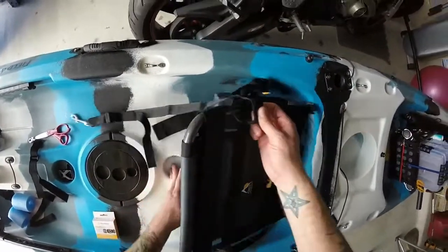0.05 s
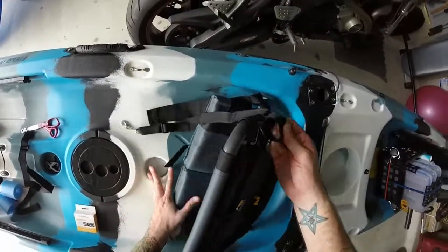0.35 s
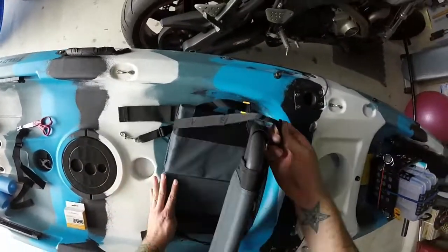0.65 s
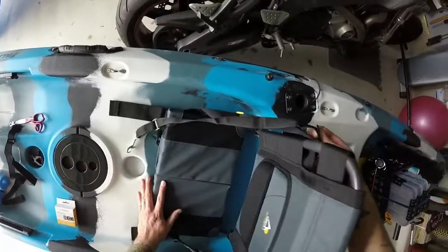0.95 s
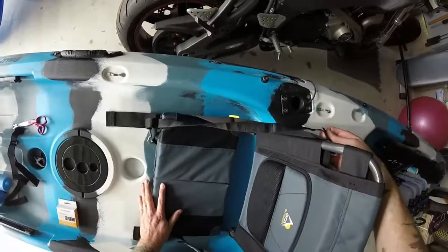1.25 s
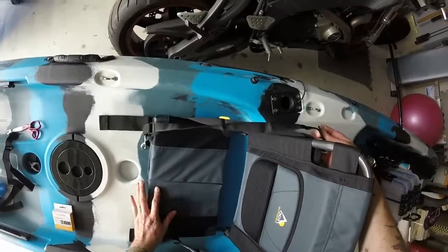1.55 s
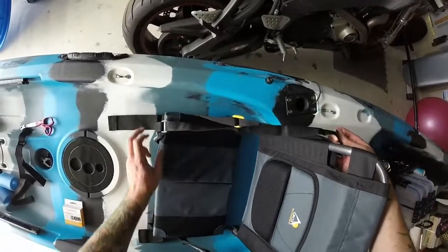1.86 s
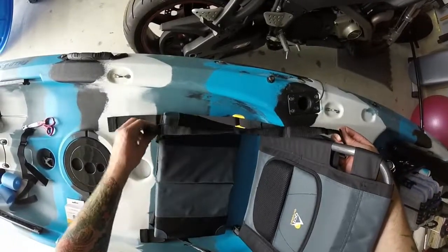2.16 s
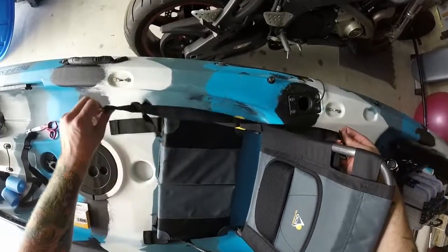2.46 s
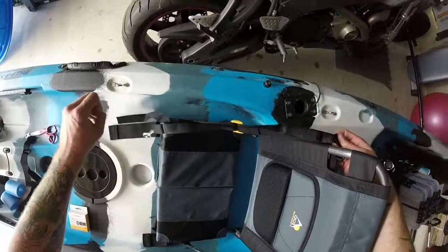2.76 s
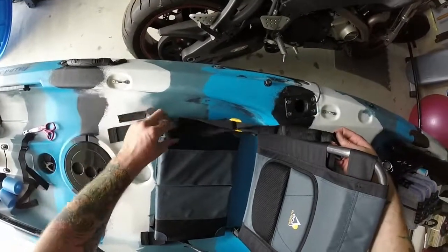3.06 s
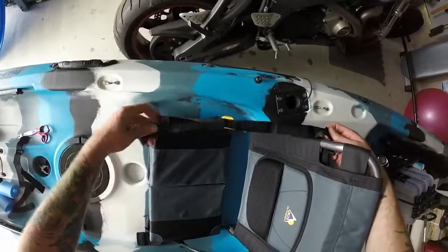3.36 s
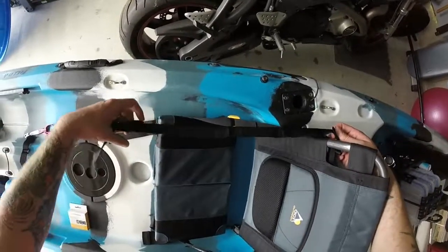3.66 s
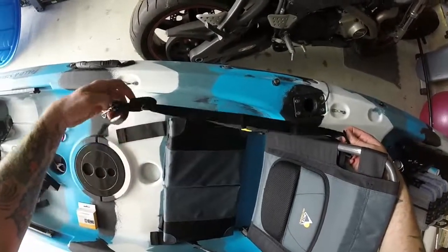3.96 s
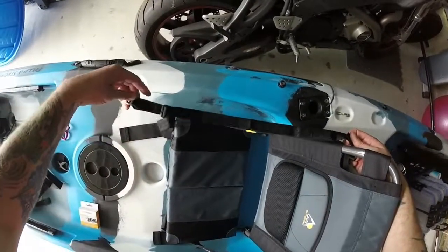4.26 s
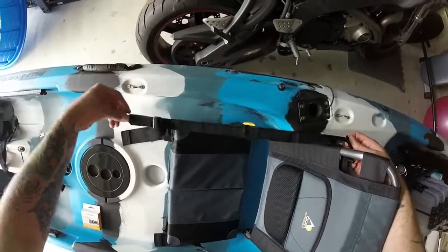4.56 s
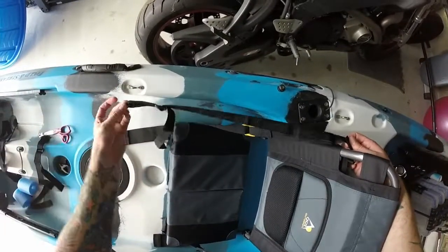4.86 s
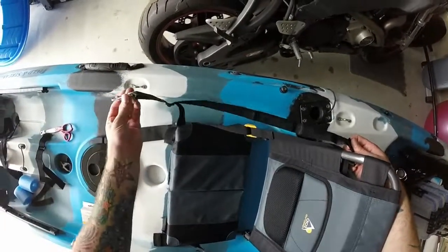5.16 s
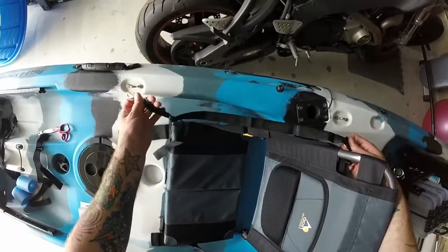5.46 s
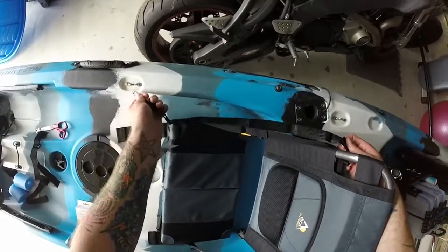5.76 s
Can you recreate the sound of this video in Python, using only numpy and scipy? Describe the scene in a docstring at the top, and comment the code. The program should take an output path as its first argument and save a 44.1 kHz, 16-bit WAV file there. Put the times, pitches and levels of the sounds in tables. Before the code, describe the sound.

Close handling sounds in a quiet, faintly humming garage. First comes a cluster of hollow thuds and rough dragging as a seat frame shifts on a plastic kayak, mixed with rasping webbing and rustling fabric. After softer bumps and a brief lull, a steel strap hook bangs loudly on the hull and clatters briefly. The hook then ticks lightly in the hand, with a few tiny squeaks and one soft knock at the end.

```python
"""Kayak seat and snap hook in a garage.

A folding seat is pushed open in a hollow plastic kayak. Its frame knocks on the hull, exciting damped
modes, and drags over it by stick-slip friction; a nylon strap rasps, the cloth swishes and thin squeaks
glide. Then the strap's metal snap hook is picked up, bangs on the hull and ticks in the hand.
The garage adds a short reverberation, and a faint hum fills the room."""
import sys
import numpy as np
from scipy import signal
from scipy.fft import rfft, irfft, next_fast_len
from scipy.io import wavfile

SR = 44100
rng = np.random.default_rng(int(sys.argv[2]) if len(sys.argv) > 2 else 0)


def master_out(mix):
    """Clip the mix to full scale and print it as 16-bit PCM to the path in sys.argv[1]."""
    frames = np.transpose(np.atleast_2d(mix))
    ceiling = np.clip(frames, -1, 1)
    pcm = np.round(ceiling * 32767).astype(np.int16)
    wavfile.write(sys.argv[1], SR, pcm)


N = 256506
TIME = np.arange(N) / SR
BLOW_TIME = TIME[:SR // 2]

# Spectrum of light contacts, cloth or steel. Each row: frequency in Hz, relative level in dB.
LIGHT_CONTACT_SPECTRUM = [(1500, -10), (3500, 8), (5500, 1), (7500, -3), (10000, -7.5), (11500, -14),
                          (11900, -10.5), (12400, -13), (14500, -18), (16000, -26)]


def hull_knocks():
    """Impact excitation: a blow gives a thud, panel modes, a hollow boom and, if hard, a crack."""
    # Each row: start in seconds, then relative levels in dB of the blow, its boom and its crack,
    # panel pitch in Hz, relative level of the panel's ring in dB.
    blows = [(0.096, -15, -17, -20, 785, -14), (0.110, -16, -1, -16, 214, -5),
             (0.151, -8, -19, -20, 567, -20), (0.204, -14, -12, -25, 209, -14),
             (0.465, -13, -13, -22, 525, -15.5), (0.514, -29.5, 7, -32, 486, -12),
             (0.630, -18, -4, -3.5, 450, -12.5), (0.64, -15, -18, -34, 463, -7),
             (0.653, -16.5, -5, -23, 455, -9), (0.897, -31, -25, -14, 713, -12),
             (1.017, -22.5, -37, -15, 885, -7), (1.068, -16.5, -9.5, -33, 835, -14.5),
             (1.221, -26.5, -28, -23, 473, -8.5), (1.745, -34.5, -11, -38, 123, -4),
             (1.860, -31, -1.5, -34, 137, -11), (2.023, -22.5, -19, -22, 500, -12),
             (2.619, -33, -13, -11, 332, -15), (2.773, -27, -8, -17.5, 750, -20),
             (2.809, -0.5, -11, -47, 960, -18), (2.850, -11, -14, -11, 305, -21.5),
             (3.022, -11.5, -20, -12.5, 545, -7.5), (3.122, -18.5, -21, -23, 640, -21.5),
             (5.797, -24, -18, -33, 960, -32)]
    # Spectra of the thud and the crack. Each row: frequency in Hz, relative level in dB.
    thud_spectrum = [(40, -29.5), (110, -14), (290, 1.5), (450, 2), (700, -3), (1000, -6), (1400, -13.5),
                     (1900, -18.5), (3500, -37.5), (16000, -84)]
    crack_spectrum = [(300, 15), (1000, 10), (1700, 5.5), (2400, 0), (3200, 0), (4200, -10), (6000, -19.5),
                      (8000, -29), (15000, -50)]
    out = np.zeros(N)
    for start, db, boom_db, crack_db, panel_hz, panel_db in blows:
        cutoff_hz = 7900 * 2 ** (crack_db / 18)  # softer contacts crack less and thud lower
        lowpass = signal.butter(2, cutoff_hz, fs=SR, output="sos")
        waves = signal.sosfilt(lowpass, impact(t60=0.12, cloud_db=7))
        tilt_db = 2 * np.log2(panel_hz / 660)  # stiffer panels thud brighter
        thud = from_db(-12) * unit_blow(colour(waves, thud_spectrum, tilt_db))
        panel = from_db(panel_db) * ring(hull_modes(panel_hz, fall_db=25.5), detune=0.0041)
        boom = from_db(boom_db - 6) * ring(hull_modes(centre_hz=209, fall_db=12), detune=0.0024)
        crack = from_db(crack_db) * unit_blow(colour(impact(t60=0.023, cloud_db=1.5), crack_spectrum))
        add(out, start, from_db(db) * (thud + panel + boom + crack))
    return out


def hull_modes(centre_hz, fall_db):
    """Selective excitation: a contact drives the modes near one pitch, fall_db less per octave away."""
    # Modes of the hull and its panels. Each row: frequency in Hz, relative level in dB, T60 in seconds.
    modes = [(122.5, -6, 0.62), (157.4, 5.5, 0.21), (197, -5.5, 0.11), (224.8, -3.5, 0.28),
             (308.6, -1.5, 0.2), (360.5, 0, 0.12), (403, -2, 0.24), (461, 7, 0.049), (505, 4, 0.057),
             (536, -6.5, 0.36), (572.5, 4.5, 0.053), (643, -11, 0.27), (751, 4, 0.1), (728, 1.5, 0.085),
             (885, 9, 0.094), (987, 1.5, 0.087), (1090, -39, 0.36), (1182, -13, 0.4), (1315, -44, 0.1)]
    return [(hz, db - fall_db * abs(np.log2(hz / centre_hz)), t60) for hz, db, t60 in modes]


def frame_drag():
    """Stick-slip friction: the frame catches on the hull, which rings, rumbles and flexes under it."""
    # Each row: start and length in seconds, then relative levels in dB of drag, rumble and flexing.
    shoves = [(-0.03, 0.59, -35, -34, -43), (0.64, 0.21, -44, -39.5, -45), (0.895, 0.12, -37, -56, -50),
              (1.04, 0.19, -38.5, -47, -40), (1.25, 0.14, -51, -53, -48), (1.57, 0.057, -45, -47, -50),
              (1.72, 0.26, -47, -42, -39.5), (3.04, 0.068, -47, -41.5, -43.5)]
    # Spectra of the drag, rumble and flexing. Each row: frequency in Hz, relative level in dB.
    drag_spectrum = [(40, -37), (150, 1), (280, -2.5), (390, 2.5), (520, 2), (850, -2), (1200, -6),
                     (1700, -16.5), (3000, -27.5), (16000, -54)]
    rumble_spectrum = [(25, -37), (70, -7), (120, -2.5), (180, 2.5), (240, -1), (330, 5), (700, -45.5),
                       (16000, -102)]
    flex_spectrum = [(20, -17), (45, -2), (75, 6.5), (110, -21), (200, -10), (600, -93), (16000, -100)]
    drag, rumble, flex = strokes(shoves, attack_s=0.037, release_s=0.25, sag_db_per_s=6)
    catches = slips(per_s=1400, size_db=2.5, clump_db=1.5)
    scrape = from_db(1) * rms_one(colour(catches, drag_spectrum))
    panel_response = ring(hull_modes(centre_hz=660, fall_db=2.5))
    panels = from_db(-1.5) * rms_one(signal.fftconvolve(catches, panel_response)[:N])
    jolts = slips(per_s=780, size_db=-3, clump_db=5.5)
    hollow = from_db(-6) * rms_one(colour(jolts, rumble_spectrum))
    groan = from_db(-3.5) * rms_one(colour(rng.standard_normal(N), flex_spectrum))
    return drag * (scrape + panels) + rumble * hollow + flex * groan


def frame_judder():
    """Self-excited oscillation: nearly periodic stick-slip makes the hull groan at the slip rate."""
    # Each row: start and length in seconds, slip rate in Hz, relative level in dB, total swell in dB.
    judders = [(0.203, 0.15, 210, -34.5, -18.5), (0.470, 0.089, 516, -36.5, -14), (3.04, .085, 500, -41, 3)]
    out = np.zeros(N)
    for start, length, slip_hz, db, swell_db in judders:
        along = np.linspace(0, 1, round(length * SR))
        hz = slip_hz * (1 + 0.09 * drift(rate=150)[:len(along)])
        phase = 2 * np.pi * np.cumsum(hz) / SR
        wave = np.sin(phase) + from_db(-30) * np.sin(2 * phase) + from_db(-24) * np.sin(3 * phase)
        grip = from_db(1.5 * drift(rate=120)[:len(along)])
        arch = np.abs(np.sin(np.pi * along)) ** 0.3
        add(out, start, from_db(db + 6 + swell_db * (along - 0.5)) * grip * arch * wave)
    return out


def strap_and_cloth():
    """Roughness noise: the coarse ribs of the webbing rasp, the fine weave of the seat cover swishes."""
    # Strap pulls and strokes over the cover. Each row: start and length in seconds, relative level in dB.
    pulls = [(-0.04, 0.52, -40), (0.07, .09, -40), (0.76, 0.2, -49.5), (0.92, 0.15, -34.5),
             (1.12, 0.1, -47), (3.01, .11, -44)]
    brushes = [(0.05, 0.075, -56), (0.22, 0.41, -65), (0.67, 0.18, -62.5), (0.815, 0.067, -60.5),
               (0.97, 0.22, -61.5), (1.53, 0.046, -60), (1.68, 0.088, -66.5), (1.905, .14, -62.5),
               (2.39, 0.086, -66), (3.11, 0.053, -68), (3.345, 0.074, -67.5)]
    # Spectrum of the webbing. Each row: frequency in Hz, relative level in dB.
    rasp_spectrum = [(500, -50.5), (1200, 9.5), (1550, 3.5), (1850, 3), (2080, 4), (2350, 2.5), (2700, 0.5),
                     (3200, -4.5), (4200, -12.5), (7000, -29), (16000, -48)]
    strap, = strokes(pulls, attack_s=0.042, release_s=0.27, sag_db_per_s=4)
    cloth, = strokes(brushes, attack_s=0.016, release_s=0.17, sag_db_per_s=1)
    ribs = slips(per_s=2500, size_db=3, clump_db=1.5)
    threads = slips(per_s=9000, size_db=3, clump_db=1.5)
    rasp = from_db(-5) * rms_one(colour(ribs, rasp_spectrum))
    swish = from_db(2) * rms_one(colour(threads, LIGHT_CONTACT_SPECTRUM))
    return strap * rasp + cloth * swish


def hook_ticks():
    """Free vibration of steel: a light contact snaps, then short modes ring and a detuned pair beats."""
    # Hook and buckle. Each row: start in seconds, relative levels in dB of the tick and its beating pair.
    ticks = [(0.1244, -52, -12), (0.2435, -46, -31), (0.327, -52, -11), (0.6978, -52, -21),
             (0.991, -45, -20), (1.0644, -53, -9), (2.4782, -46, -21), (2.532, -48.5, -23),
             (2.57, -41, -25), (2.8124, -34.5, -21), (2.8482, -42, -23), (3.44, -50, -19),
             (3.697, -46, -23), (3.7656, -47, -29), (3.8247, -51, -9), (4.0702, -48.5, -28),
             (4.585, -45, -16)]
    # Modes of the hook. Each row: frequency in Hz, relative level in dB, T60 in seconds.
    hook_modes = [(4340, 23, 0.11), (6000, -13, .02), (7100, -30, 0.014), (8660, -8, .02),
                  (14200, -11, 0.022)]
    mode_pair = [(11920, 0, 0.09)] * 2
    out = np.zeros(N)
    for start, db, pair_db in ticks:
        contact = impact(t60=0.025, cloud_db=3)
        snap = from_db(-11) * unit_blow(colour(contact, LIGHT_CONTACT_SPECTRUM, tilt_db=3))
        body = from_db(-27.5) * ring(hook_modes, scatter_db=2, detune=0.045)
        beating = from_db(pair_db - 4) * ring(mode_pair, detune=0.008)
        add(out, start, from_db(db) * (snap + body + beating))
    return out


def squeaks():
    """Frequency modulation: a fast random flutter of pitch makes thin gliding tones hoarse."""
    # Each row: start and length in seconds, first and last pitch in Hz, rms flutter in Hz, level in dB.
    glides = [(1.287, 0.1, 4980, 4730, 220, -64.5), (1.305, 0.21, 3930, 3660, 185, -63.5),
              (3.88, 0.17, 4700, 4030, 264, -66), (4.182, 0.26, 7450, 7420, 30, -73),
              (5.42, 0.16, 4740, 4050, 465, -61.5), (5.461, 0.024, 5530, 6500, 110, -55.5)]
    out = np.zeros(N)
    for start, length, start_hz, end_hz, flutter_hz, db in glides:
        along = np.linspace(0, 1, round(length * SR))
        flutter = flutter_hz * drift(rate=700)[:len(along)]
        phase = 2 * np.pi * np.cumsum(start_hz + (end_hz - start_hz) * along + flutter) / SR
        # Only the lower squeaks carry an octave, and hoarseness weakens it.
        octave = from_db(-5 - flutter_hz / 20) * np.sin(2 * phase) * (end_hz < 7000)
        arch = np.sqrt(2 * np.abs(np.sin(np.pi * along)))
        add(out, start, from_db(db) * arch * (np.sin(phase) + octave))
    return out


def garage(x, wet_db):
    """Reverberation: diffuse reflections build up over milliseconds and die sooner in the treble."""
    # Each row: frequency in Hz, reverberation time T60 in seconds.
    decay_times = [(100, 0.43), (500, 0.42), (2000, 0.36), (6000, 0.29), (14000, 0.32)]
    tail, edges_hz = 0, np.geomspace(50, 18000, 9)
    for low, high in zip(edges_hz, edges_hz[1:]):
        bandpass = signal.butter(2, [low, high], "band", fs=SR, output="sos")
        band = signal.sosfilt(bandpass, rng.standard_normal(len(BLOW_TIME)))
        tail = tail + band * decay(at_hz(decay_times, np.sqrt(low * high)))
    tail = tail * (1 - decay(t60=0.034)) ** 2
    return x + from_db(wet_db) * signal.fftconvolve(x, tail / np.linalg.norm(tail))[:N]


def room_tone():
    """Ambient noise: steady broadband air and a hum whose lines are broadened by random modulation."""
    # Spectrum of the air noise. Each row: frequency in Hz, relative level in dB.
    air_spectrum = [(12, -47), (20, -9), (59, 0.5), (122, -1.5), (196, -8.5), (232, -4.5), (274, -9),
                    (362, -3.5), (439, -9), (767, -10), (1980, -20.5), (6020, -33), (10800, -43.5),
                    (12100, -45.5), (15500, -53)]
    # Each row: frequency in Hz, level in dB.
    hum_lines = [(59.2, -64), (366, -59.5), (781, -69.5)]
    air = from_db(-48.5) * rms_one(colour(rng.standard_normal(N), air_spectrum))
    hum = 0
    for hz, db in hum_lines:
        waver = drift(rate=20) + 1j * drift(rate=20)
        hum = hum + from_db(db) * np.real(waver * np.exp(2j * np.pi * hz * TIME))
    return air + hum


def ring(modes, scatter_db=1.0, detune=0):
    """Modal superposition: the striking point sets each mode's strength and sign, the grip its pitch."""
    out = 0
    for hz, db, t60 in modes:
        strength = from_db(db + scatter_db * rng.standard_normal()) * rng.choice([-1, 1])
        detuned_hz = hz * (1 + detune * rng.standard_normal())
        out = out + strength * np.sin(2 * np.pi * detuned_hz * BLOW_TIME) * decay(t60)
    return unit_blow(out)


def impact(t60, cloud_db):
    """Impulse response: a click and the dense cloud of waves that it sends round the struck body."""
    cloud = from_db(cloud_db) * unit_blow(rng.standard_normal(len(BLOW_TIME)) * decay(t60))
    return cloud + unit_blow(1.0 * (BLOW_TIME == 0))


def slips(per_s, size_db, clump_db):
    """Friction as a Poisson process: tiny catches of uneven size whose strength comes in clumps."""
    caught = rng.random(N) < per_s / SR
    sizes = from_db(size_db * np.minimum(rng.exponential(1, N), 4)) * rng.choice([-1, 1], N)
    return caught * sizes * from_db(clump_db * drift(rate=70))


def strokes(rows, attack_s, release_s, sag_db_per_s):
    """Amplitude envelopes, one per level column: a stroke swells, sags, then falls 60 dB per release."""
    out = 0
    for start, length, *levels_db in rows:
        age = np.maximum(TIME - start, 0)
        fall_db = sag_db_per_s * age + 60 * np.maximum(age - length, 0) / release_s
        out = out + np.outer(from_db(levels_db), np.minimum(age / attack_s, 1) * from_db(-fall_db))
    return out


def colour(x, spectrum, tilt_db=0):
    """Minimum-phase filtering: a folded cepstrum imposes the spectrum, tilted by tilt_db per octave."""
    size = 2 * next_fast_len(len(x))
    hz = np.arange(size // 2 + 1) * SR / size
    tilted = [(f, db + tilt_db * np.log2(f / spectrum[0][0])) for f, db in spectrum]
    cepstrum = irfft(np.log(from_db(at_hz(tilted, hz))))
    cepstrum[1:size // 2] *= 2
    cepstrum[size // 2 + 1:] = 0
    return irfft(rfft(x, size) * np.exp(rfft(cepstrum)))[:len(x)]


def at_hz(points, hz):
    """Interpolation of a table on a logarithmic frequency axis."""
    f, value = np.transpose(points)
    return np.interp(np.log(hz + 1), np.log(f), value)


def drift(rate):
    """Random modulation of rms 1, interpolated between `rate` values a second."""
    knots = rng.standard_normal(N // 50)
    return rms_one(np.interp(TIME * rate, np.arange(len(knots)), knots))


def decay(t60):
    """Exponential damping by 60 dB in t60 seconds."""
    return from_db(-60 * BLOW_TIME / t60)


def from_db(db):
    """Amplitude ratio of a level in decibels."""
    return 10 ** (np.asarray(db) / 20)


def rms_one(x):
    """Power normalisation to rms 1."""
    return x / np.sqrt(np.mean(x ** 2) + 1e-20)


def unit_blow(x):
    """Energy normalisation to that of ten milliseconds at rms 1."""
    return x / np.sqrt(np.sum(x ** 2) * 100 / SR + 1e-20)


def add(track, start_s, sound):
    """Superposition of a sound on the track from a given time."""
    start = max(round(start_s * SR), 0)
    track[start:start + len(sound)] += sound[:N - start]


def scene():
    """Mid-side stereo: a faint decorrelated copy of the middle gives slight stereo width."""
    # Each row: frequency in Hz, level of the side relative to the middle in dB.
    width = [(40, -27), (200, -45.5), (700, -40), (1400, -29.5), (3000, -25.5), (6000, -24), (14000, -21)]
    handling = hull_knocks() + frame_judder() + frame_drag() + strap_and_cloth() + hook_ticks() + squeaks()
    middle = garage(handling, wet_db=-10) + room_tone()
    scatter = rng.standard_normal(len(BLOW_TIME)) * decay(t60=0.071)
    decorrelated = signal.fftconvolve(middle, scatter / np.linalg.norm(scatter))[:N]
    side = colour(decorrelated, width)
    return np.array([middle + side, middle - side])


def record(dry):
    """Band limiting: an elliptic low-pass cuts steeply above 15.3 kHz."""
    return signal.sosfilt(signal.ellip(10, 0.2, 80, 15300, fs=SR, output="sos"), dry)


dry = scene()
out = record(dry)
master_out(out)
```